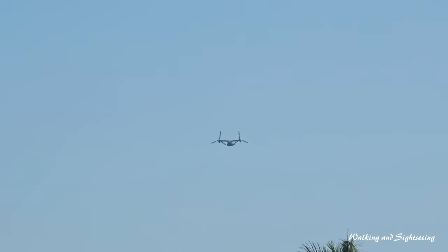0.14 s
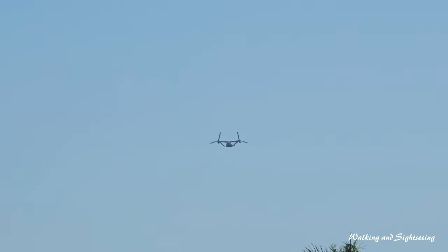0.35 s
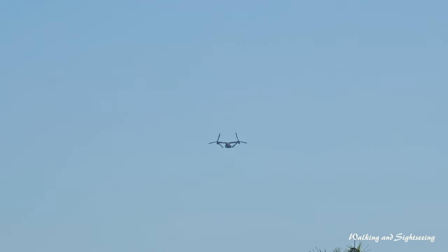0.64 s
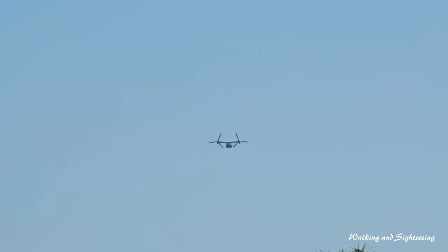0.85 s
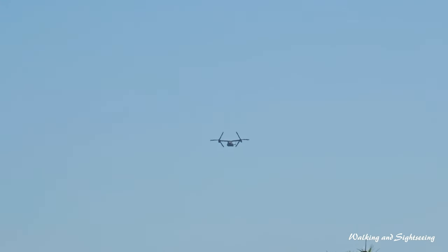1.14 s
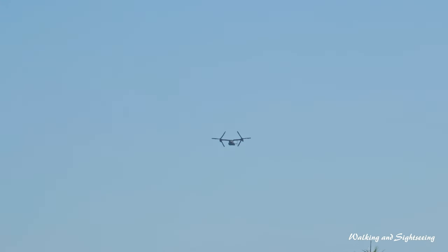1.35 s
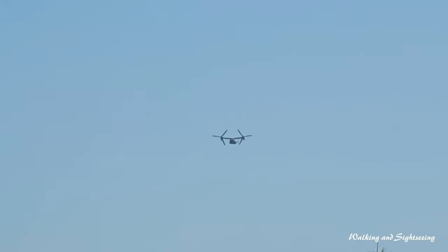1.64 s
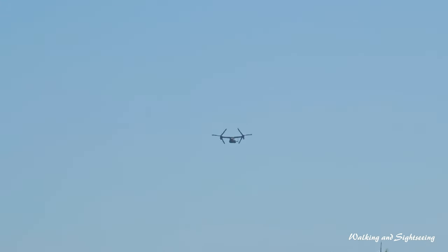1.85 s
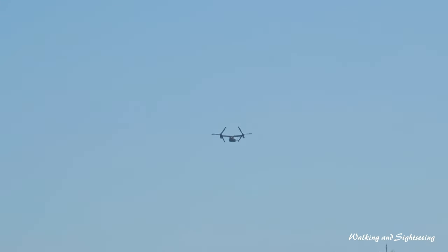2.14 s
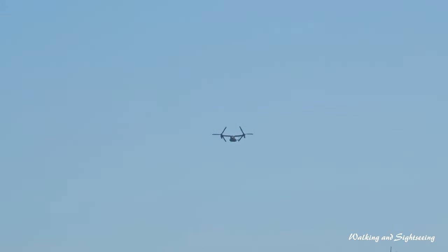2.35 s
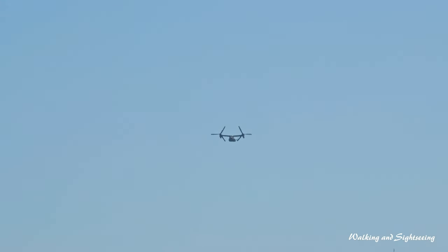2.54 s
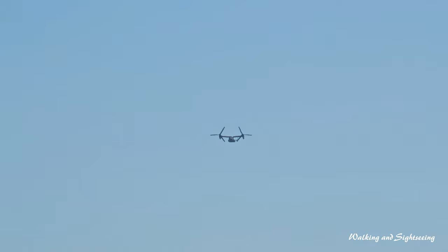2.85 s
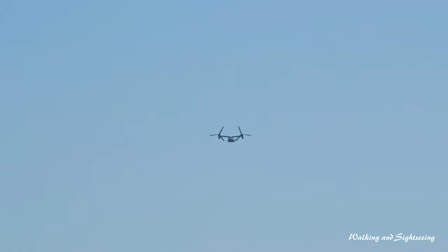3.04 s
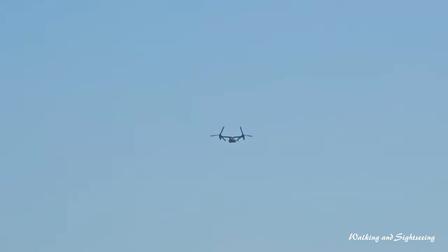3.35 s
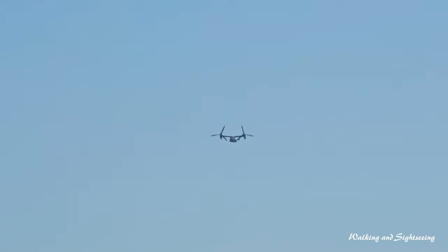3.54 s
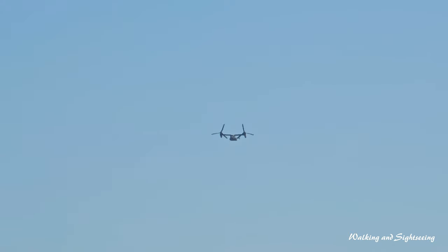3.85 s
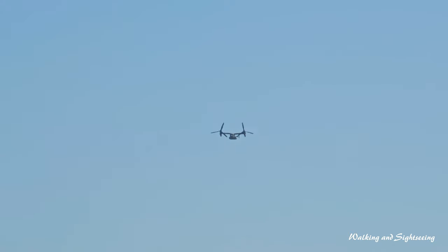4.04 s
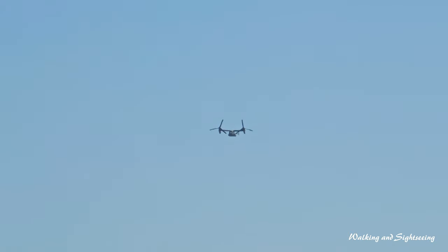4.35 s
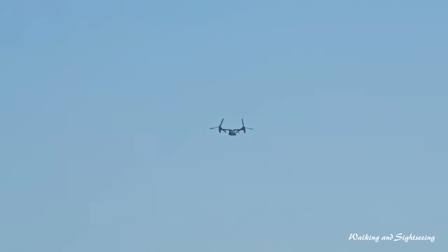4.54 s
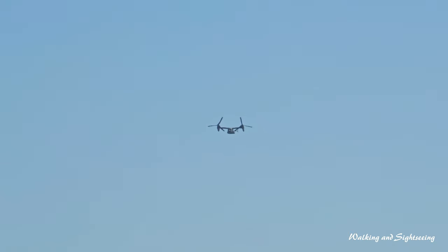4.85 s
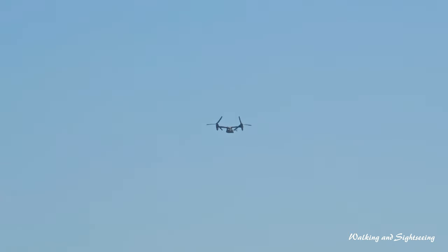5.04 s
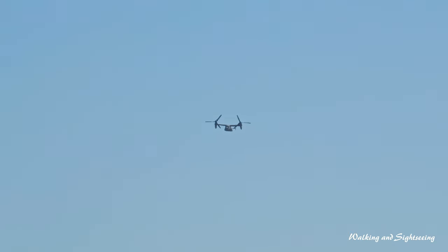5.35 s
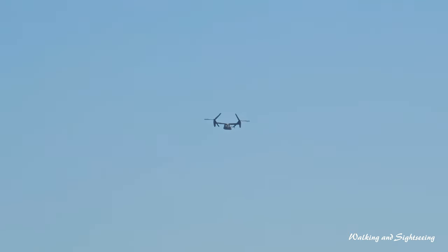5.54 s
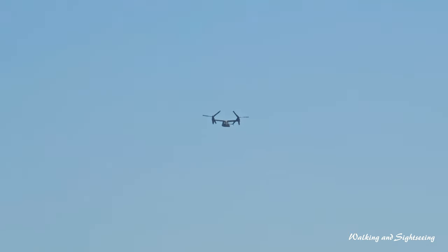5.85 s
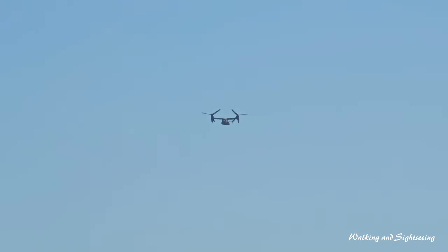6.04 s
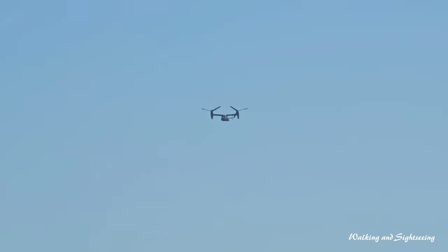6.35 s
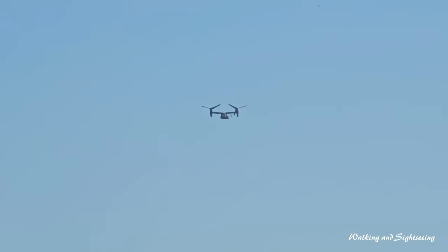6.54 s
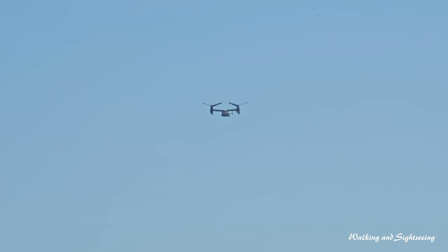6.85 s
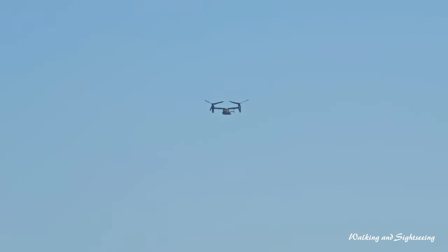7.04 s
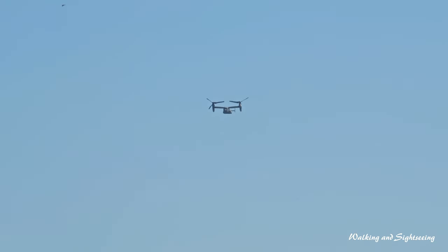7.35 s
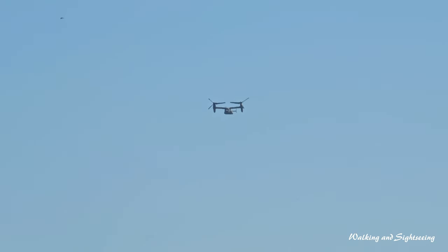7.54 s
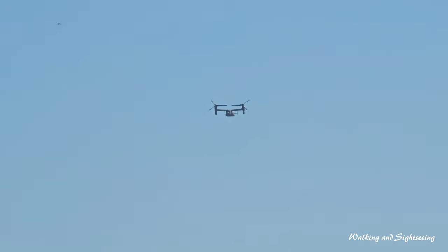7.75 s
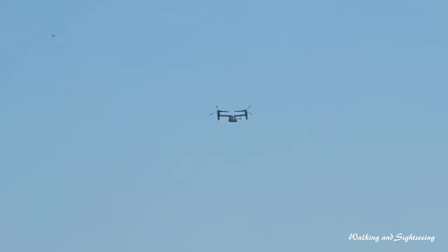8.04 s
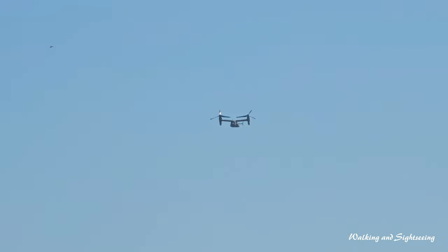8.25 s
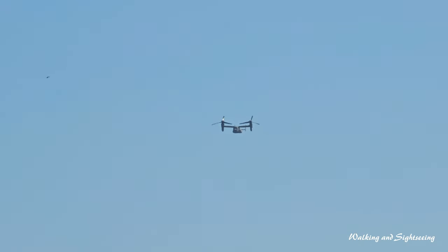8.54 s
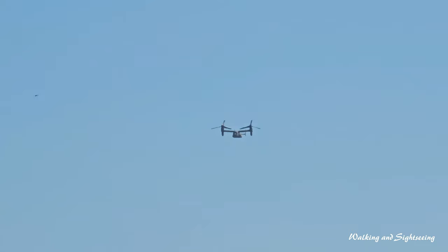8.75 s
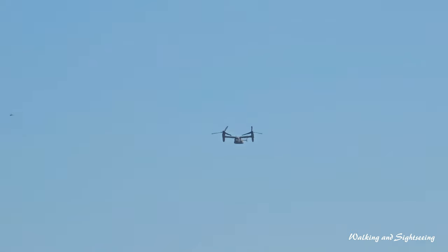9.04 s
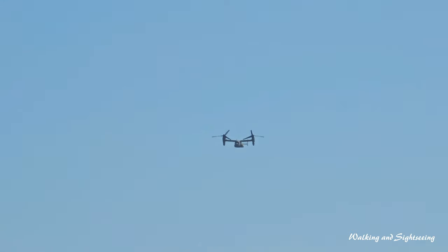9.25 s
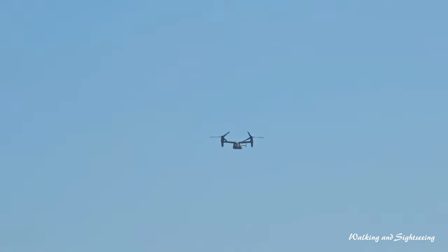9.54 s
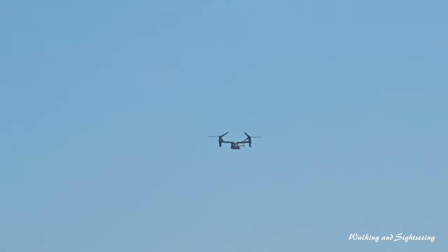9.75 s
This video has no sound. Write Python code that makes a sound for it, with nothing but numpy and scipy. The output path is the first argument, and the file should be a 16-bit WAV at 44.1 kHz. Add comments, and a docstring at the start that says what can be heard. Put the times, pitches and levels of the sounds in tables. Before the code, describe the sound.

A distant tiltrotor aircraft drones low and wavering over a soft roar, then wind buffets the microphone with heavy, irregular bassy thumps.

```python
"""An airfield, where a tiltrotor aircraft comes in from far off and two microphone ports stand in the breeze.
Low rotor tones, an engine drone and a sinking hum are wavering sines; the distant roar is filtered noise
that swells band by band, with narrow drifting bands and a breathy whine. Gusts buffet the ports, alone or
together, as low noise and single pressure pulses. Dry fronds hiss, a bird chirps faintly as short tone
pulses, and brief scratches and rough puffs are bursts of band-passed noise."""
import sys
import numpy as np
from scipy import signal
from scipy.fft import rfft, irfft
from scipy.io import wavfile
from scipy.ndimage import uniform_filter1d

SR = 44100
rng = np.random.default_rng(int(sys.argv[2]) if len(sys.argv) > 2 else 0)


def put_to_file(sound):
    """Save the sound as 16-bit audio at rate SR, in the file named by the first command-line argument."""
    columns = np.atleast_2d(sound).T  # one column per channel
    safe = np.clip(columns, -1, 1)
    whole_steps = np.round(safe * 32767)
    wavfile.write(sys.argv[1], SR, whole_steps.astype(np.int16))


N = 436590
T = np.arange(N) / SR  # time [s]
HZ = np.maximum(np.fft.rfftfreq(N, 1 / SR), 1)  # spectrum bins [Hz]


def undb(db):
    """Amplitude ratio: 20 dB are a factor of ten in pressure."""
    return 10 ** (np.asarray(db) / 20)


def curves(rows):
    """Linear interpolation in time: each column of a table, read at every sample."""
    s, *columns = np.transpose(rows)
    return [np.interp(T, s, column) for column in columns]


def over_hz(points):
    """Linear interpolation of a (frequency [Hz], value) table over the logarithm of frequency."""
    hz, value = np.transpose(points)
    return np.interp(np.log(HZ), np.log(np.maximum(hz, 1)), value)


def unit(x):
    """Normalisation to unit root mean square."""
    return x / np.sqrt(np.mean(x ** 2))


def walk(rate):
    """Slow random modulation: values held 1 / rate seconds, smoothed twice, of spread about 1."""
    hold = int(SR / rate)
    steps = np.repeat(rng.standard_normal(N // hold + 1), hold)
    smooth = uniform_filter1d(uniform_filter1d(steps, hold), hold)
    return 1.283 * smooth[:N]


def tinted(colour_db):
    """Spectral shaping: white noise multiplied by a given spectrum, rms 1."""
    return unit(irfft(rfft(rng.standard_normal(N)) * undb(colour_db), N))


def swelling(colour_db, gain_db, slow_db, quick_db, count):
    """Band-wise amplitude modulation: noises cut into half-octave slices that swell a little apart."""
    rms = np.sqrt(np.mean(undb(2 * colour_db)))
    spectra = rfft(rng.standard_normal((count, N))) * undb(colour_db) / rms
    out = 0
    for k in range(20):
        share = np.clip(1 - abs(2 * np.log2(HZ / 25) - k), 0, 1)  # triangles upward from 25 Hz
        if np.max(share * undb(colour_db - colour_db.max())) > 1e-3:  # negligible slices are skipped
            out = out + irfft(spectra * share, N) * undb(slow_db * walk(3) + quick_db * walk(11))
    return out * undb(gain_db)


def ports(shared, own):
    """Interaural-type coherence and phase: both ports hear a shared field, each adds a part of its own."""
    # power that both ports share: (frequency [Hz], share [0-1])
    likeness = [(30, .55), (70, .75), (100, .92), (160, .99), (270, .97), (350, .8), (540, .7), (640, .55),
                (780, .3), (1000, .42), (1300, .57), (1800, .4), (2600, .24), (3300, .08), (7000, .03)]
    # phase by which the left port leads: (frequency [Hz], phase [rad])
    lead = [(40, -.28), (540, -.4), (640, -.8), (760, -2.3), (900, -2.8), (1300, -3.2), (1600, -3.1),
            (1900, -2.4), (2200, -.9), (2600, -.3), (7000, 0)]
    # level balance: (frequency [Hz], left minus right [dB])
    balance = [(60, 0.0), (92, -0.6), (140, -0.5), (220, -0.5), (330, -0.085), (510, -0.17), (780, -0.11),
               (1200, -0.24), (1840, -1.4), (2820, -0.98)]
    like, turn, tilt = over_hz(likeness), np.exp(.5j * over_hz(lead)), undb(over_hz(balance) / 2)

    def spectrum(x):
        """Periodic extension: a ramp is removed so that the ends meet before the transform."""
        return rfft(x - np.linspace(x[..., 0], x[..., -1], N, axis=-1))

    both = spectrum(shared) * np.sqrt(like)
    alone = spectrum(own) * np.sqrt(1 - like)
    return irfft((both * np.array([turn, 1 / turn]) + alone) * np.array([tilt, 1 / tilt]), N)


def roar():
    """Broadband radiation of far rotors and jets: rumble, body and rush, each with its own swell."""
    # levels: (time [s], rumble under 300 Hz [dB], body 300-900 Hz [dB])
    roar_levels = [(0, -31.5, -45), (.6, -34.5, -47.5), (1.4, -36.5, -46.5), (2.0, -36, -46),
                   (2.4, -35, -46), (3.1, -28, -46.5), (3.6, -34.5, -46), (4.8, -32, -47),
                   (5.2, -31.5, -49.5), (6.0, -35, -47), (6.4, -31, -51), (6.8, -35, -43.5),
                   (7.2, -33.5, -49), (7.6, -29.5, -47.5), (8.0, -31, -50.5), (8.4, -33.5, -46.5),
                   (9.2, -32, -49), (9.9, -29.5, -48)]
    # relative spectrum: (frequency [Hz], density [dB per Hz])
    roar_colour = [(15, -15.5), (28, -6.5), (40, -4.5), (70, -3.5), (130, -5), (170, -11.5), (250, -17),
                   (330, -26.5), (620, -29), (760, -32), (1100, -31.5), (1600, -35), (2150, -42.5),
                   (3100, -50), (3900, -53), (4600, -57), (5100, -63), (7000, -86), (15000, -110)]
    # Gaussian humps on that spectrum: (centre [Hz], width [Hz], height [dB])
    roar_humps = [(498, 57, 5), (1410, 300, 2.5), (2810, 90, 3.5), (4530, 130, 1.5)]
    # spread of the quick swell: (rumble [dB], body [dB], rush [dB]); the rush is steadiest
    flicker_db = (2.5, 2.6, 1.3)
    rush_db = -54.5 + 0.1352 * T  # start [dB], rise [dB/s]
    colour_db = over_hz(roar_colour)
    for hz, width, db in roar_humps:
        colour_db = colour_db + db * np.exp(-.5 * ((HZ - hz) / width) ** 2)
    under_300, under_900 = 1 / (1 + (HZ / 300) ** 8), 1 / (1 + (HZ / 900) ** 8)
    shares = under_300, under_900 - under_300, 1 - under_900  # of power
    air = 0
    for share, db, quick_db in zip(shares, curves(roar_levels) + [rush_db], flicker_db):
        layer_db = colour_db + 10 * np.log10(share + 1e-15)
        air = air + swelling(layer_db, db, slow_db=.7, quick_db=quick_db, count=3)
    return ports(air[0], air[1:])


def patches():
    """Frequency modulation by a warped time axis: narrow noise bands and a whine drift, flare and fade."""
    # narrow bands of the roar: (centre [Hz], width [Hz], level [dB])
    narrow_bands = [(478.6, 35, -55), (589.5, 35, -57.5), (2092, 140, -73.5), (429.2, 31, -62)]
    # breathy whine: (time [s], level [dB])
    whine_level = [(0, -62), (3, -61), (4.7, -61), (4.85, -58), (5.2, -61), (6.0, -58), (6.4, -60),
                   (6.5, -53), (6.6, -57), (6.85, -58), (7.1, -62), (7.32, -60), (7.42, -53), (7.53, -57),
                   (7.6, -54), (7.7, -56), (7.77, -53), (7.9, -59), (8.2, -57), (8.35, -54), (8.6, -57),
                   (8.8, -55), (8.95, -58), (9.15, -56), (9.35, -59), (9.6, -56), (9.9, -56)]
    whine_hz, whine_width_hz = 1335, 95
    drift_hz = 13  # spread of the wandering centres
    air = 0
    for hz, width, db in narrow_bands + [(whine_hz, whine_width_hz, curves(whine_level)[0])]:
        bent = T + np.cumsum(drift_hz / hz * walk(4)) / SR
        colour_db = np.maximum(-4.3 * ((HZ - hz) / width) ** 2, -150)
        # one shared band and one for each port
        band = np.array([np.interp(bent, T, tinted(colour_db), period=N / SR) for _ in range(3)])
        air = air + band * undb(db + 2.0 * walk(5) + 2.6 * walk(22))
    return ports(air[0], air[1:])


def birds():
    """Gaussian tone pulses: short notes whose phase is blurred by a quick random warble."""
    # faint far chirps: (time [s], pitch [Hz], half-length to 1/e [s], peak [dB])
    chirps = [(.255, 3850, .012, -72), (.26, 3550, .012, -73), (6.52, 4600, .015, -75),
              (6.66, 4150, .015, -74), (6.7, 4240, .022, -71), (8.045, 3500, .02, -69),
              (8.58, 3520, .015, -71), (8.67, 4150, .02, -73), (8.815, 4130, .025, -69),
              (8.93, 3550, .02, -73), (8.98, 4250, .03, -75), (9.06, 4200, .025, -75),
              (9.38, 3350, .02, -74), (9.11, 6100, .05, -81)]
    out = np.zeros(N)
    warble = np.cumsum(.03 * walk(150)) / SR  # pitch strays by about 3 percent
    for s, hz, length, db in chirps:
        envelope = undb(db) * np.exp(-((T - s) / length) ** 2)
        out += envelope * np.sin(2 * np.pi * hz * (T + warble))
    return out


def fronds():
    """Modulated noise: a grainy hiss swells and fades on its own slow course, its lower part to the left, its
    top to the right."""
    # fronds in the breeze: (time [s], level [dB])
    frond_level = [(0, -93.5), (2, -87), (2.8, -81.5), (3.6, -74.5), (4.2, -71.5), (5.05, -72.5),
                   (5.8, -75.5), (6.5, -73), (8.3, -77.5), (9.1, -72), (9.6, -76.5), (9.9, -75)]
    # relative spectrum: (frequency [Hz], density [dB per Hz])
    frond_colour = [(2000, -31), (3000, -4), (4300, 4), (5200, -4.5), (6300, -5), (7600, -11), (8500, -8.5),
                    (9300, -4), (10300, -11), (11500, -11.5), (12500, -15), (15700, -29.5)]
    # balance: (frequency [Hz], left minus right [dB])
    frond_tilt = [(3500, 4.5), (5500, 4), (8000, -2.5), (15000, -1)]
    alike = .1  # share of power that both ports hear
    rustle_db = curves(frond_level)[0] + 1.5 * walk(150) + 1.0 * walk(14)
    hiss = swelling(over_hz(frond_colour), rustle_db, slow_db=.5, quick_db=1.9, count=3)
    tilt = undb(over_hz(frond_tilt) / 2)
    mixed = np.sqrt(alike) * hiss[0] + np.sqrt(1 - alike) * hiss[1:]
    return irfft(rfft(mixed) * np.array([tilt, 1 / tilt]), N)


def scratches():
    """Band-passed noise bursts: brief scratches and rough puffs under two-sided Gaussian envelopes."""
    # (time [s], level at the peak [dB], rise [s], fall [s], low edge [Hz], high edge [Hz],
    #  left minus right [dB])
    bursts = [(7.765, -62, .005, .008, 2800, 8000, 2), (7.782, -62, .012, .025, 2000, 9000, 2),
              (9.715, -71, .006, .012, 4000, 14000, 4), (3.04, -77, .003, .006, 8000, 15000, 2),
              (6.55, -76, .008, .015, 4000, 14000, -2), (5.03, -75, .02, .02, 4000, 10000, -1),
              (4.875, -48, .015, .04, 620, 850, 0), (4.92, -54, .03, .04, 800, 1100, 0),
              (4.96, -49, .04, .02, 650, 930, 0), (5.645, -49, .004, .008, 600, 950, 0),
              (5.74, -47, .03, .08, 520, 680, 0), (4.76, -47, .04, .04, 540, 660, 0),
              (4.31, -46, .05, .1, 430, 600, 0), (2.069, -76, .002, .004, 11000, 15500, 0),
              (2.425, -78, .002, .003, 9000, 15500, 0), (7.53, -47, .01, .022, 540, 740, 0),
              (7.62, -60, .02, .02, 1500, 1650, 0), (1.15, -43, .03, .04, 190, 280, 1),
              (7.79, -39, .03, .03, 260, 330, -2), (6.85, -46, .08, .05, 250, 330, 0),
              (7.7, -36, .06, .04, 190, 260, 0), (7.5, -39, .06, .06, 190, 260, 0),
              (7.4, -43, .06, .1, 250, 330, 0)]
    out = np.zeros((2, N))
    for s, db, rise, fall, low_hz, high_hz, pan_db in bursts:
        at = slice(int((s - 3 * rise) * SR), int((s + 3 * fall) * SR))
        shape = np.exp(-((T[at] - s) / np.where(T[at] < s, rise, fall)) ** 2)
        band = signal.butter(2, [low_hz, high_hz], "band", fs=SR, output="sos")
        noise = unit(signal.sosfilt(band, rng.standard_normal((3, SR))))[:, -len(shape):]
        # low puffs reach both ports alike, high scratches less so
        alike = min((700 / low_hz) ** 2, .8)
        noise = np.sqrt(alike) * noise[0] + np.sqrt(1 - alike) * noise[1:]
        out[:, at] += noise * shape * undb(db + pan_db * np.array([[.5], [-.5]]))
    return out


def wind():
    """Turbulent pressure on the ports: a thud on each, a quicker flutter partly shared, single eddies."""
    # gusts: (time [s], strength [dB], left minus right [dB], flutter relative to strength [dB])
    gusts = [(0, -57, -1, -8.5), (1.8, -51.5, 1.5, -9.5), (2.15, -32.5, 11, -19), (2.4, -34, 7.5, -16),
             (2.6, -24.5, 9, -24), (2.86, -22, -5, -9), (3.05, -37.5, -10, -7.5), (3.2, -32, 2, -3.5),
             (3.45, -36.5, 15, -17.5), (3.7, -31, -6.5, -4), (4.35, -30.5, -2, -6.5), (5.0, -36.5, -4, -4),
             (5.85, -25, 0, -7.5), (6.4, -31.5, -4.5, -12), (6.58, -23, 0, -7.5), (6.8, -29.5, -1.5, -2.5),
             (7.45, -28, -4, -11), (8.0, -36, -9, -7), (8.45, -25.5, 2.5, -7.5), (8.8, -25.5, -0.5, -9),
             (9.0, -26, -3, -9.5), (9.35, -31, -2, -4), (9.65, -25.5, 2.5, -13.5), (9.9, -28, -0.5, -3.5)]
    # relative spectra of thud and flutter: (frequency [Hz], density [dB per Hz])
    thud_colour = [(12, -12), (25, -4), (41, 0), (65, 0), (110, -4), (140, -12), (200, -40), (1000, -140)]
    flutter_colour = [(80, -30), (115, -8), (140, 0), (185, -2), (265, -11), (310, -21), (360, -31),
                      (600, -48), (2000, -140)]
    # strongest eddies: (time [s], peak [dB], pitch [Hz], cycles within 1/e, port 0 left 1 right 2 both)
    strong_eddies = [(2.236, -15, 92, 1.1, 0), (2.544, -13, 96, 2.8, 0), (2.669, -11, 91, 1.0, 0),
                     (2.864, -14, 58, 1.7, 0), (2.881, -12, 66, 1.2, 1), (3.176, -14, 90, 1.6, 0),
                     (3.204, -16, 170, 1.5, 0), (3.222, -3.5, 178, 1.7, 0), (3.225, -18, 110, 2.2, 1),
                     (3.405, -12, 60, 1.2, 0), (3.435, -15, 95, 2.5, 0), (3.579, -12, 90, 1.4, 0),
                     (3.597, -12, 85, 1.4, 0), (3.629, -6, 95, 2.2, 0), (3.6505, -5, 160, 1.3, 0),
                     (3.807, -16, 88, 1.2, 1), (4.34, -21, 160, 3, 2), (4.378, -22, 125, 2.2, 2),
                     (4.42, -20, 165, 2, 2), (4.685, -20, 55, 1.3, 2), (4.725, -22, 175, 2, 2),
                     (4.81, -21, 150, 2.5, 2), (4.85, -21, 100, 2, 2), (4.955, -19, 100, 2.2, 2),
                     (4.987, -20, 50, 1.2, 2), (5.011, -18, 122, 2.5, 2), (5.33, -20, 115, 2.5, 2),
                     (5.372, -20, 70, 1.4, 2), (5.455, -21, 62, 1.2, 2), (5.716, -23, 190, 1.5, 2),
                     (5.816, -14, 79, 1.2, 0), (5.82, -16, 76, 0.9, 1), (5.928, -14, 62, 1.2, 1),
                     (5.953, -19, 75, 1.3, 2), (6.043, -18, 80, 2.0, 2), (6.571, -15, 57, 1.4, 0),
                     (6.576, -15, 66, 1.0, 1), (6.907, -15, 74, 2.8, 2), (6.984, -16, 70, 1.2, 2),
                     (7.093, -19, 72, 2.0, 2), (7.17, -19, 105, 1.6, 2), (7.242, -15, 85, 2.2, 2),
                     (7.36, -21, 105, 3, 2), (7.508, -16, 69, 1.2, 2), (7.731, -15, 141, 0.9, 1),
                     (8.09, -20, 100, 1.6, 2), (8.2, -21, 65, 1.3, 2), (8.291, -14, 90, 1.1, 2),
                     (8.3, -29, 250, 7, 2), (8.45, -22, 65, 1.5, 2), (8.529, -16, 86, 2.9, 2),
                     (8.63, -19, 110, 2.5, 2), (8.725, -19, 75, 1.4, 2), (8.96, -21, 190, 2.5, 2),
                     (8.98, -19, 100, 3.2, 2), (9.002, -15, 90, 1.4, 1), (9.29, -20, 72, 2, 2),
                     (9.493, -17, 120, 1.2, 2), (9.641, -16, 62, 1.1, 2), (9.727, -17, 65, 1.0, 2)]
    alike = .22  # share of flutter power that both ports feel together
    small_count, small_over_wind_db = 24, 4
    small_hz, small_spread_oct, small_cycles = 85, 0.64, 1.4

    out = np.zeros((2, N))
    strength_db, lean_db, flutter_db = curves(gusts)
    strength_db = strength_db + 2.2 * walk(10)  # quick puffs and lulls
    port_db = [strength_db + lean_db / 2, strength_db - lean_db / 2]
    common = tinted(over_hz(flutter_colour)) * undb(strength_db + flutter_db + 3.0 * walk(25))
    for port, db in enumerate(port_db):
        out[port] = tinted(over_hz(thud_colour)) * undb(db - 2.5 + 2.8 * walk(15))
        own = tinted(over_hz(flutter_colour)) * undb(db + flutter_db + 3.0 * walk(25))
        out[port] += np.sqrt(1 - alike) * own + np.sqrt(alike) * common

    # weaker eddies come by chance and follow the wind's strength
    small = []
    for when, pitch, side in rng.random((small_count, 3)):
        s, port = .2 + when * (N / SR - .4), int(3 * side)
        hz = small_hz * 2 ** (small_spread_oct * (2 * pitch - 1))
        db = strength_db[int(s * SR)] + small_over_wind_db
        small.append((s, db, hz, small_cycles, port))
    for s, db, hz, cycles, port in strong_eddies + small:
        at = slice(int((s - .1) * SR), int((s + .1) * SR))
        turns = (T[at] - s) * hz
        envelope = undb(db) * np.exp(-(2 * turns / cycles) ** 2)
        hit = slice(port % 2, port + 1)  # one port or both
        out[hit, at] -= envelope * np.cos(2 * np.pi * turns - .2)
    return out


def tone(hz, db, waver_hz, fade_db):
    """Frequency and amplitude modulation: a sine that the moving air bends in pitch and level."""
    phase = 2 * np.pi * (np.cumsum(hz + waver_hz * walk(9)) / SR + rng.random())
    return np.sqrt(2) * undb(db + fade_db * walk(8)) * np.sin(phase)  # db is an rms level


def engines():
    """Discrete-frequency radiation: a climbing drone, a sinking hum and a set of low rotor tones."""
    # drone, which sags now and then and dies away: (time [s], level [dB])
    drone_level = [(0, -32), (.3, -28.5), (.85, -25.5), (1.08, -31), (1.25, -25.5), (1.55, -26.5),
                   (1.74, -33.5), (1.9, -24.5), (2.2, -27), (2.42, -33), (2.58, -28.5), (2.78, -35.5),
                   (2.98, -23.5), (3.12, -29.5), (3.22, -27.5), (3.34, -40), (3.44, -26.5), (3.56, -44.5),
                   (4.0, -49.5), (9.9, -63.5)]
    # sinking hum: (time [s], pitch [Hz], level [dB])
    hum = [(0, 186, -47), (1, 184, -46), (2, 181, -49), (3, 178, -45), (3.8, 176, -41), (4.4, 175.6, -38),
           (4.55, 175.4, -45), (4.75, 175, -41), (5.2, 173.5, -40), (5.7, 170.5, -42), (6.2, 168, -55),
           (9.9, 165, -60)]
    # low rotor tones: (frequency [Hz], level before the swell [dB])
    rotor_tones = [(39.4, -38.5), (55.6, -36.5), (68.4, -36), (82.8, -38.5), (126, -40.5), (134, -57.5)]
    # their common swell: (time [s], level change [dB])
    rotor_swell = [(0, 1), (1, 1.5), (2, 2.5), (3, -5), (3.6, -5), (5, -12.5), (9.9, -12)]
    drone_hz = 109.9 + 1.85 * T  # start [Hz], climb [Hz/s]
    sound = tone(drone_hz, curves(drone_level)[0], waver_hz=1.0, fade_db=1.8)
    sound += tone(*curves(hum), waver_hz=1.8, fade_db=3.0)
    swell_db = curves(rotor_swell)[0]
    for hz, db in rotor_tones:
        sound += tone(hz, db + swell_db, waver_hz=2.6, fade_db=3)
    return ports(sound, np.zeros((2, N)))


def scene():
    """Superposition: the pressures of all sources add at the two ports."""
    return engines() + roar() + patches() + wind() + fronds() + scratches() + birds()


def record(dry):
    """Self-noise and band limiting: faint hiss, a 10 ms fade-in, cuts of the deepest bass and the top."""
    # relative hiss spectrum: (frequency [Hz], density [dB per Hz])
    hiss_colour = [(4000, -5.5), (6000, 1.5), (9000, -1.5), (10300, -5.5), (12000, -6), (14500, -3),
                   (15700, -3)]
    hiss_db, low_cut_hz, top_hz = -79, 14, 15720
    colour_db = over_hz(hiss_colour) - 80 * (HZ < 3000)
    hiss = np.array([tinted(colour_db) for _ in range(2)]) * undb(hiss_db)
    opening = np.sin(np.pi / 2 * np.minimum(T / .01, 1)) ** 2
    high_pass = signal.butter(2, low_cut_hz, "high", fs=SR, output="sos")
    low_pass = signal.ellip(10, .2, 70, top_hz, fs=SR, output="sos")  # ripple, stop-band depth [dB]
    return signal.sosfilt(low_pass, signal.sosfilt(high_pass, (dry + hiss) * opening))


dry = scene()
out = record(dry)
put_to_file(out)
```